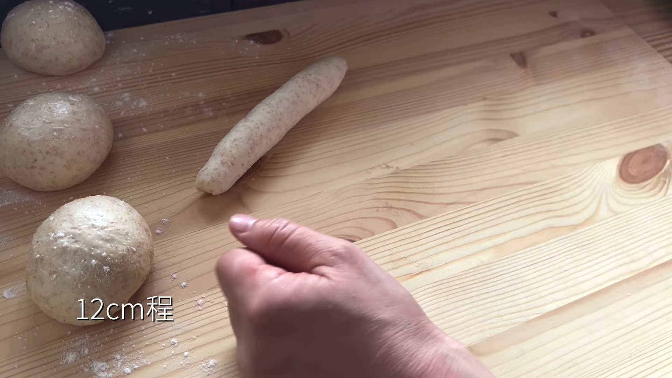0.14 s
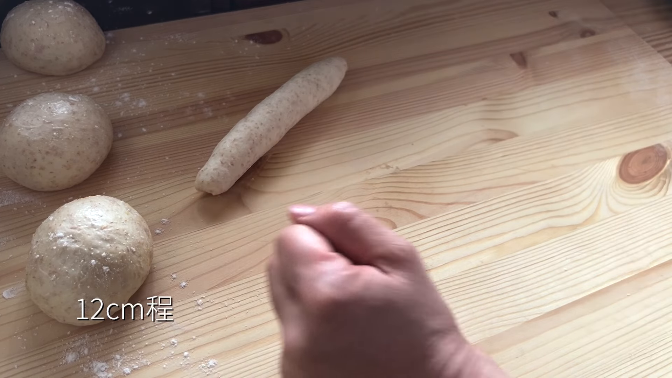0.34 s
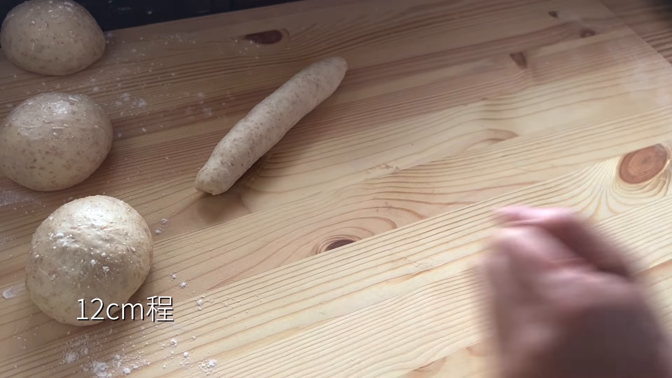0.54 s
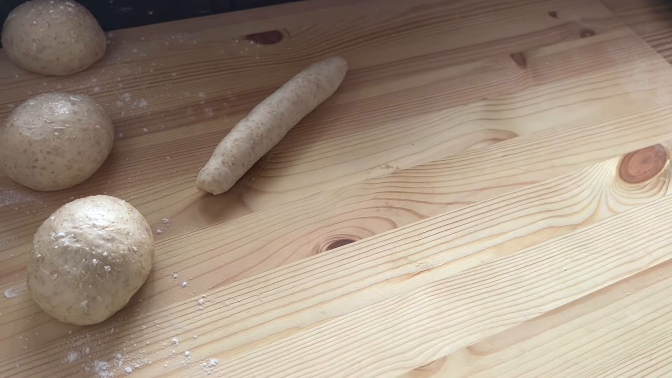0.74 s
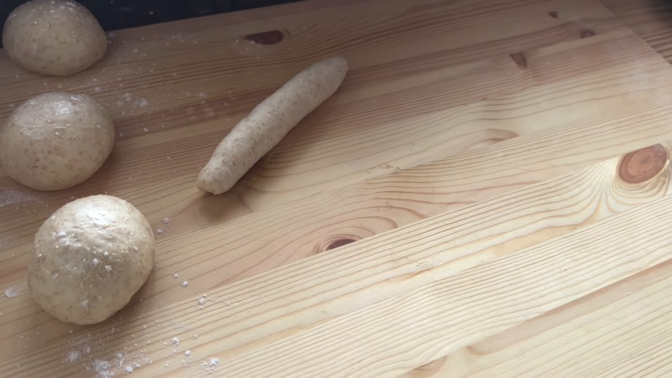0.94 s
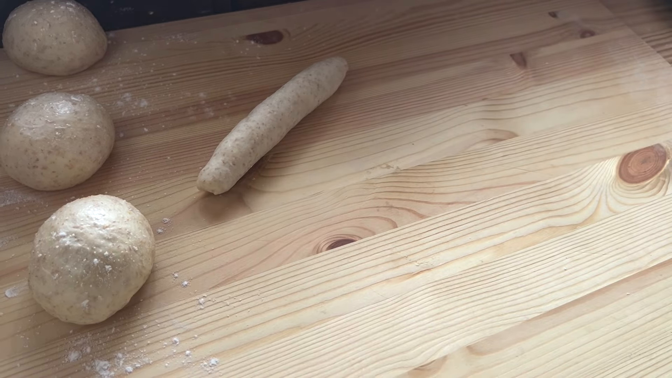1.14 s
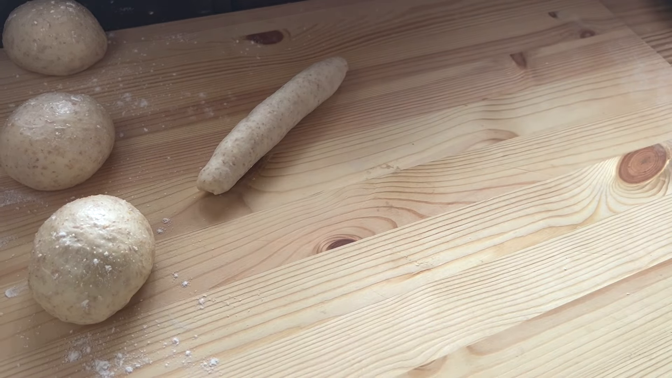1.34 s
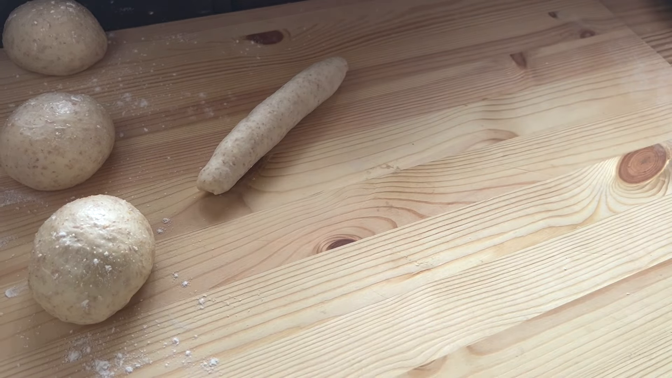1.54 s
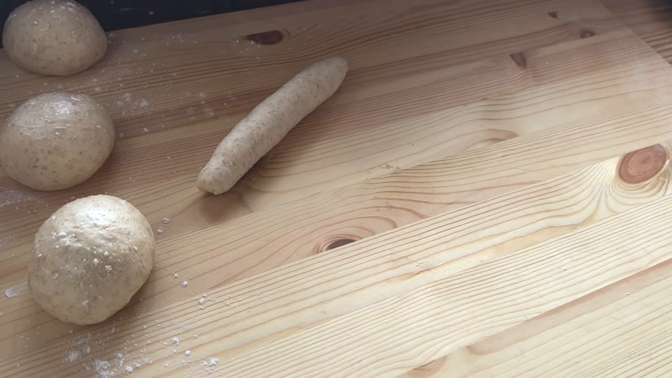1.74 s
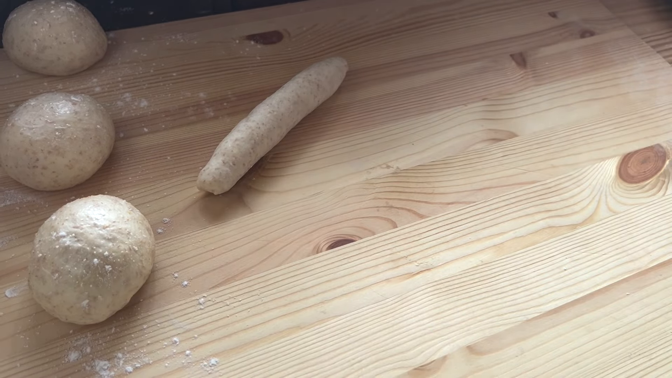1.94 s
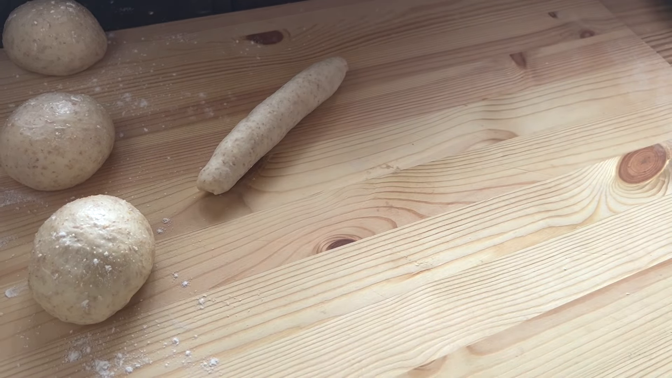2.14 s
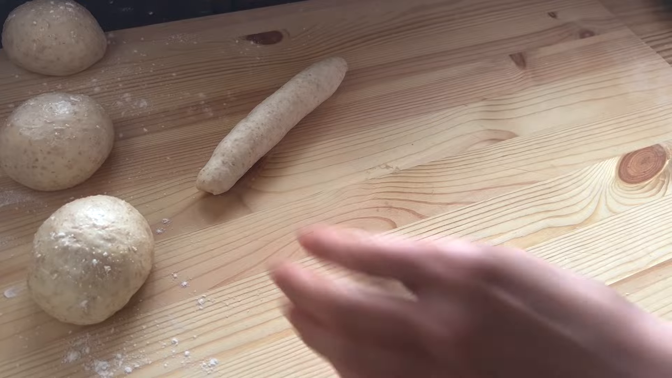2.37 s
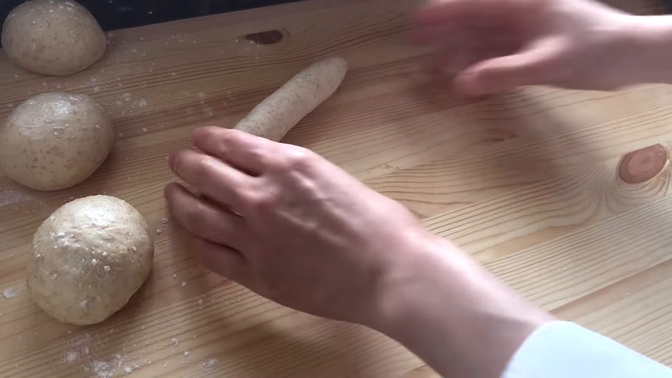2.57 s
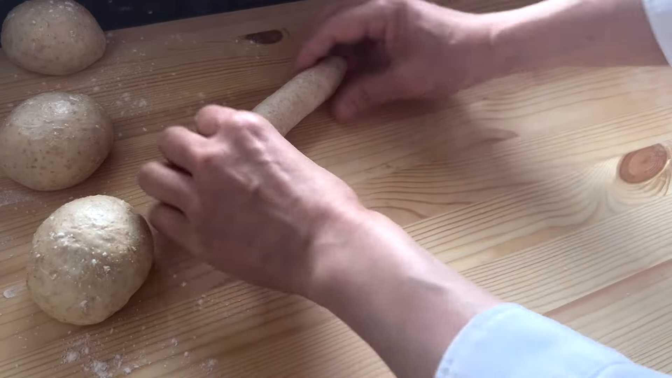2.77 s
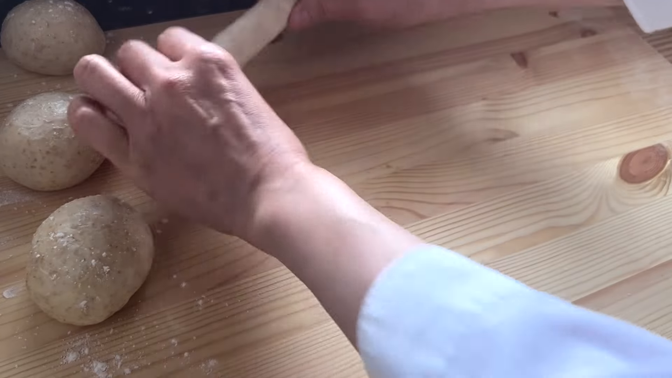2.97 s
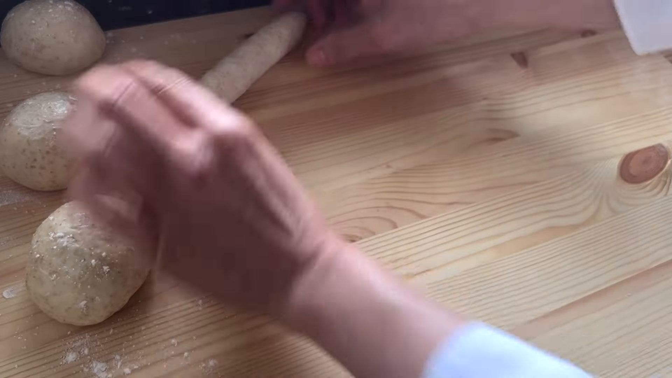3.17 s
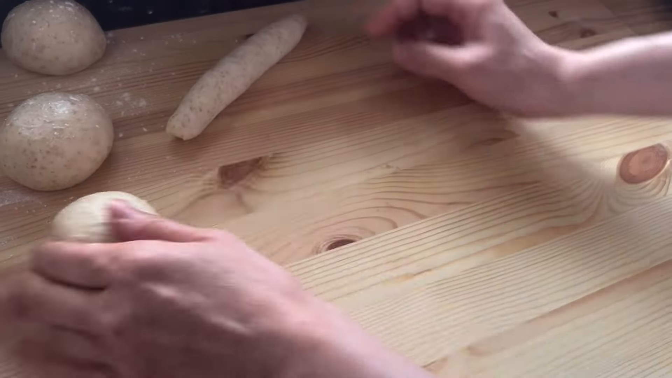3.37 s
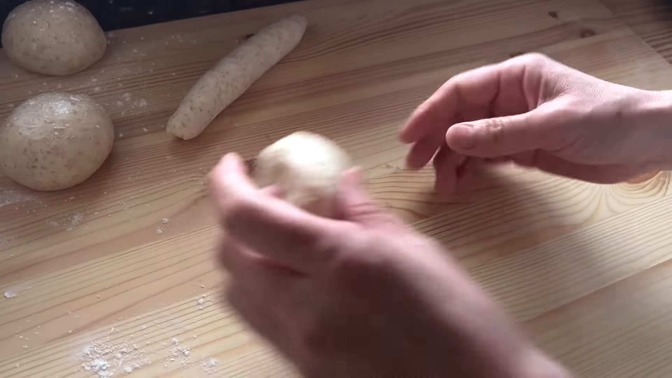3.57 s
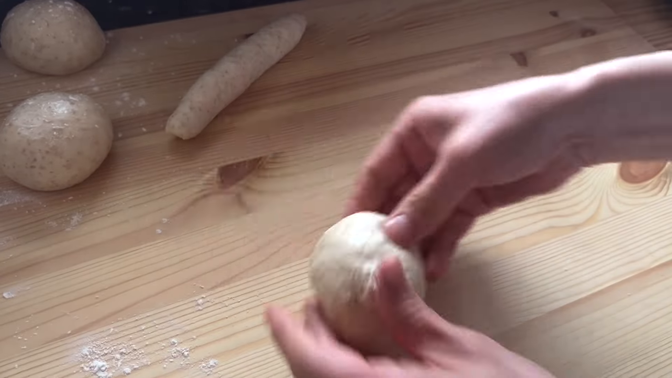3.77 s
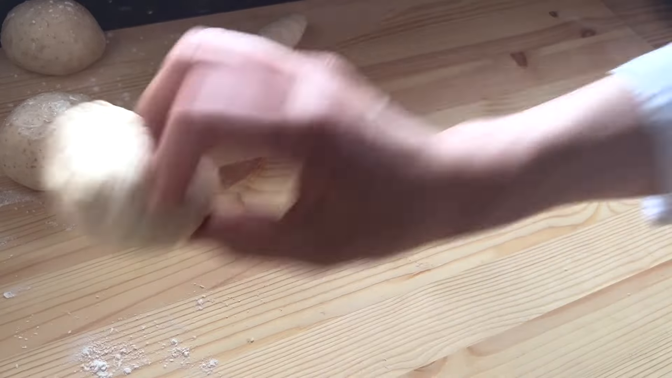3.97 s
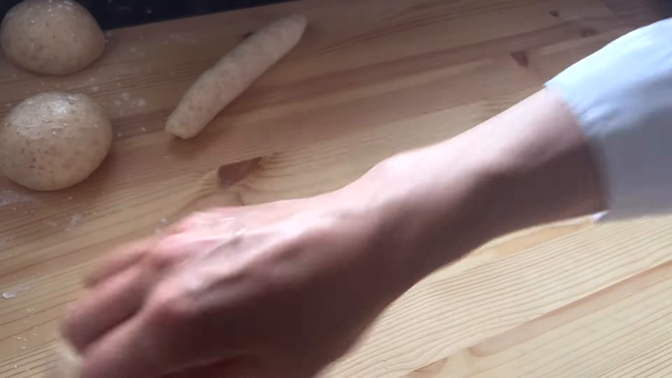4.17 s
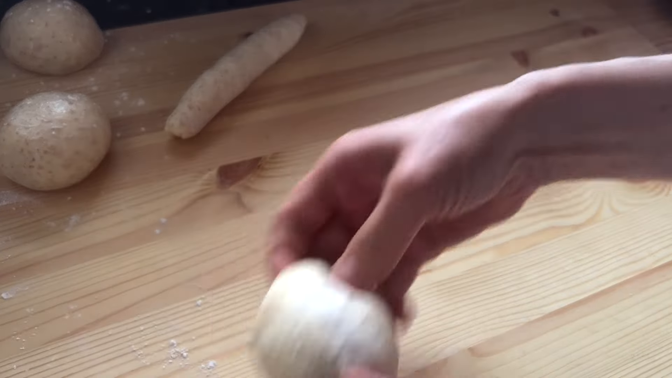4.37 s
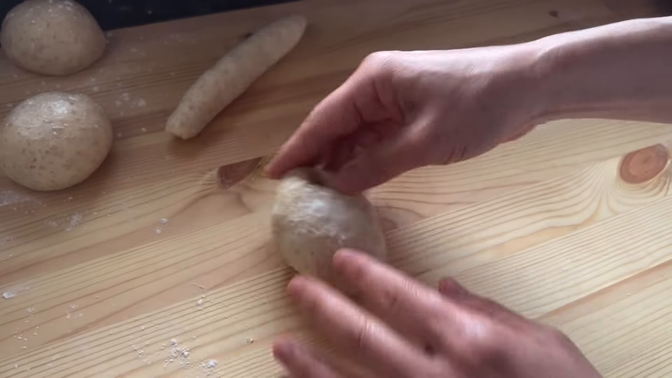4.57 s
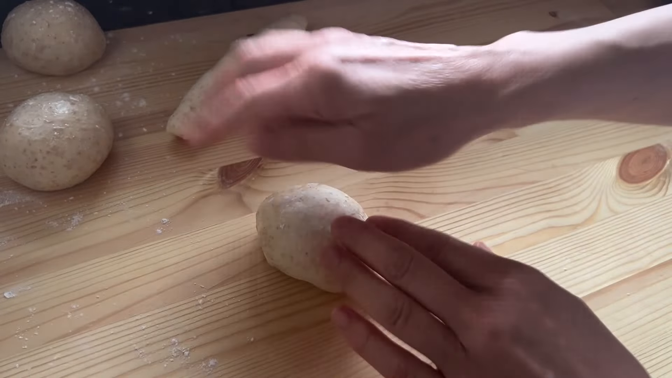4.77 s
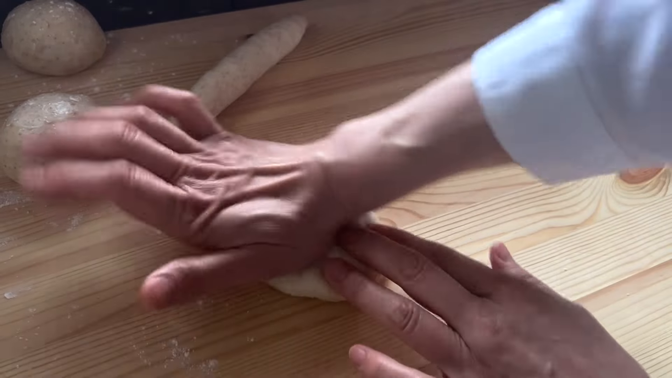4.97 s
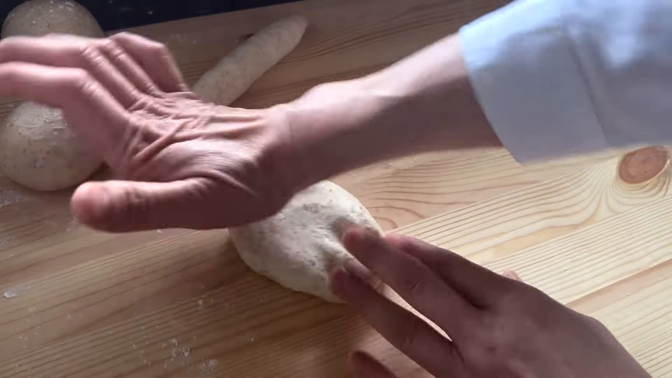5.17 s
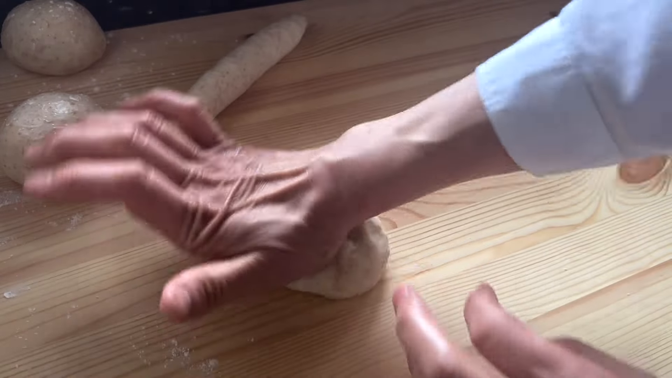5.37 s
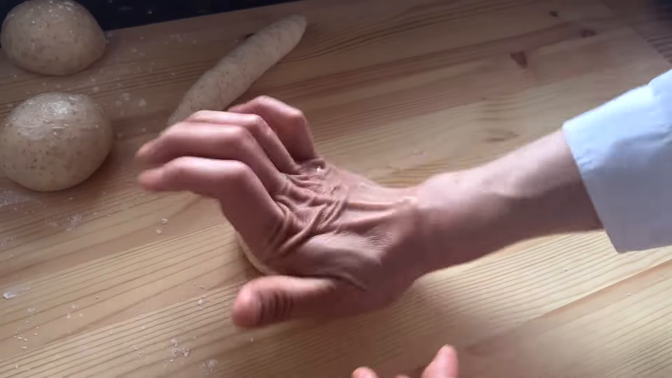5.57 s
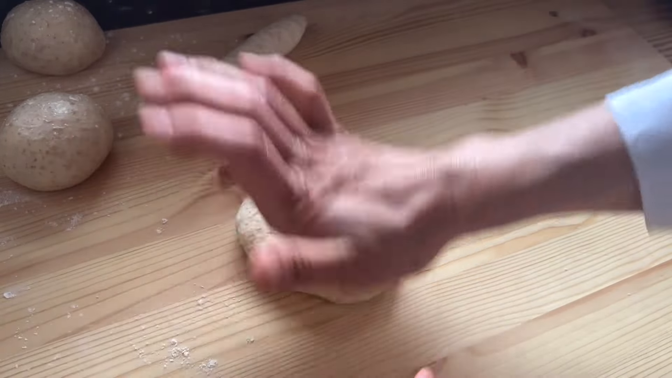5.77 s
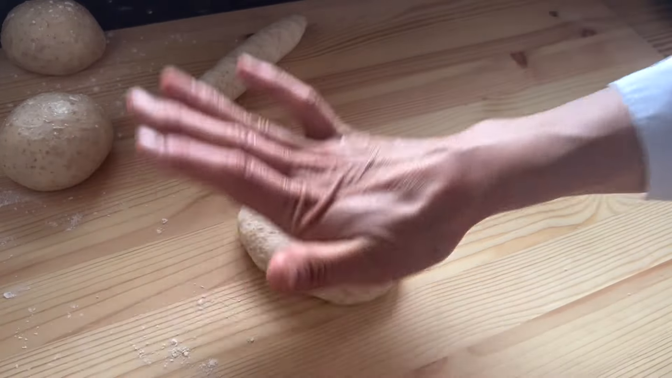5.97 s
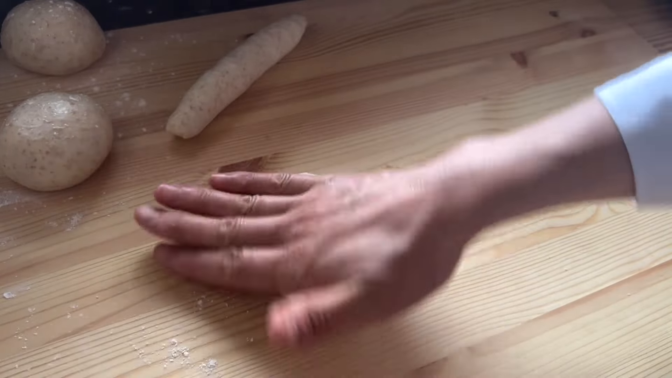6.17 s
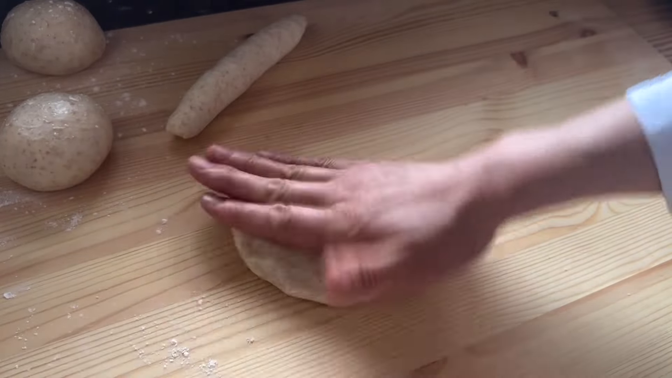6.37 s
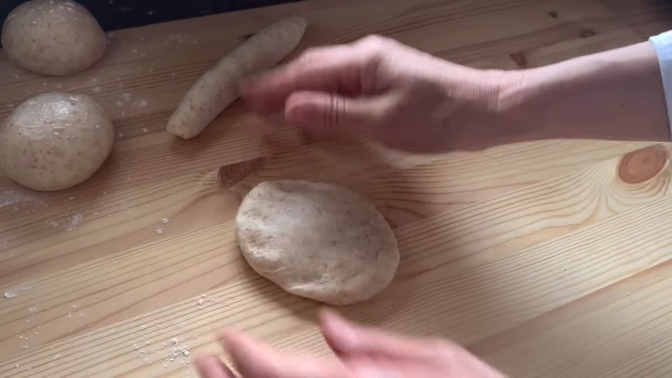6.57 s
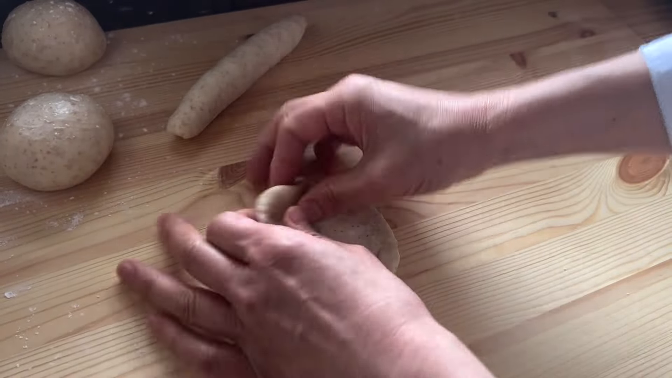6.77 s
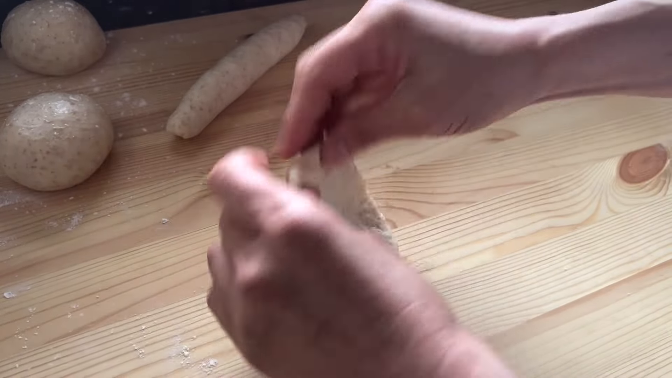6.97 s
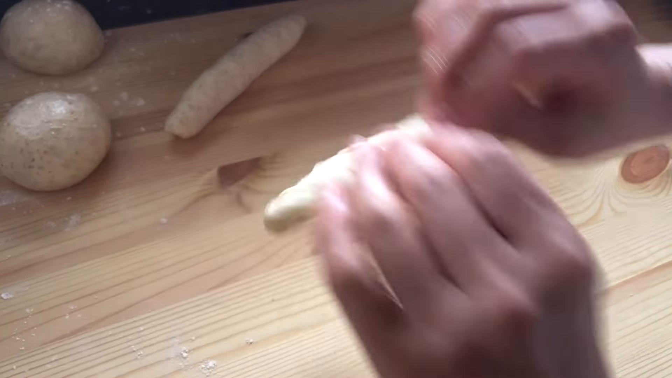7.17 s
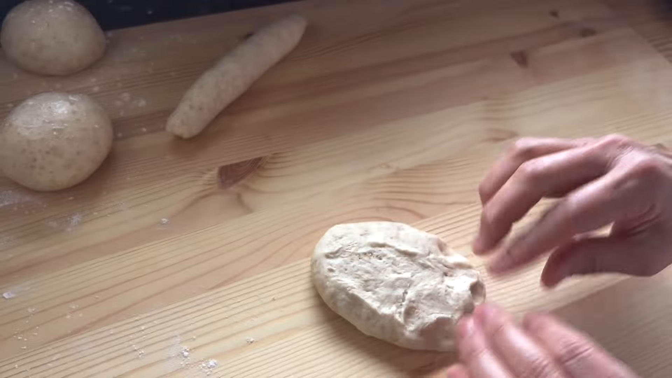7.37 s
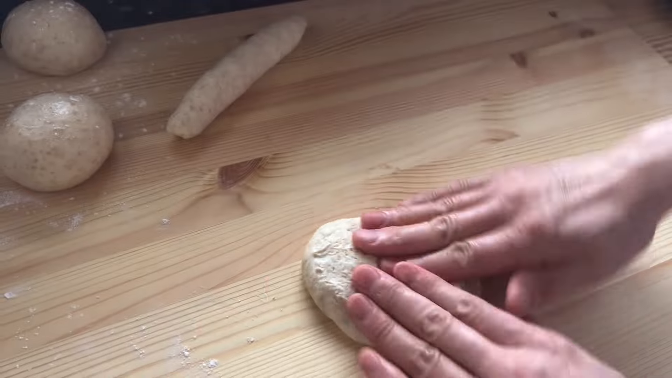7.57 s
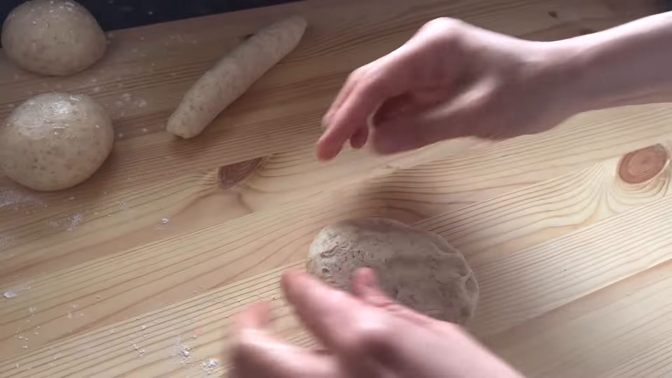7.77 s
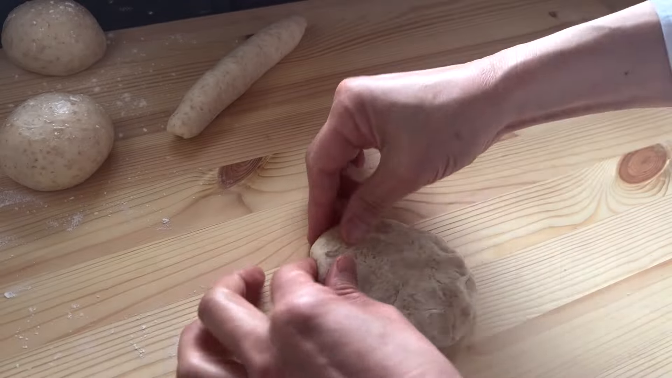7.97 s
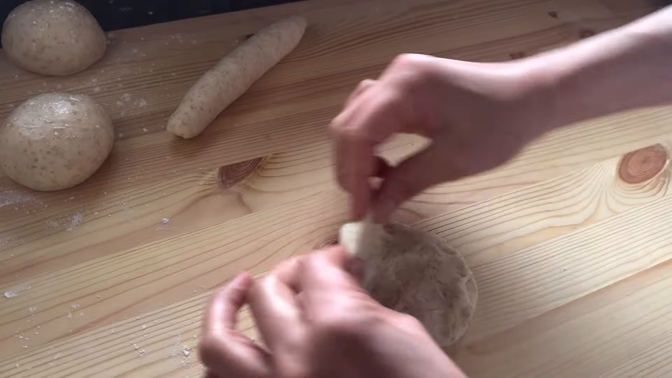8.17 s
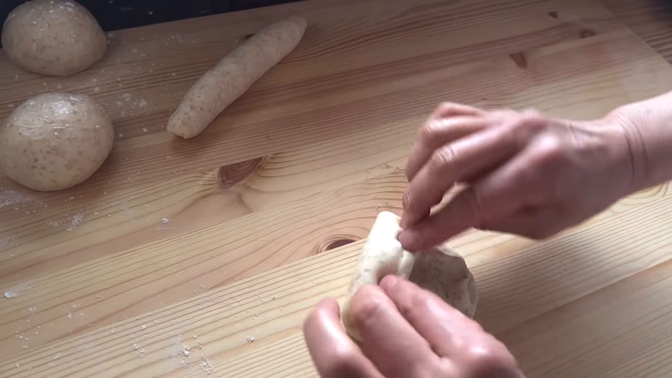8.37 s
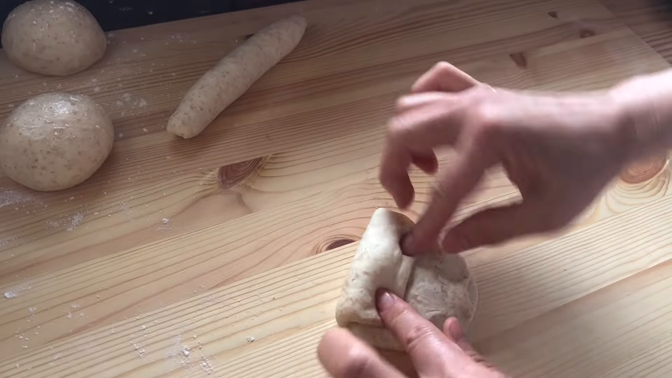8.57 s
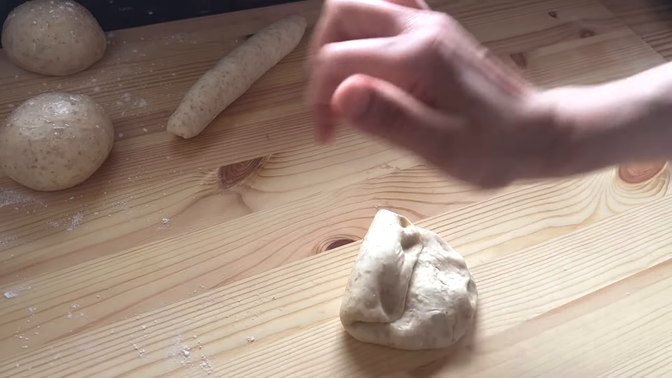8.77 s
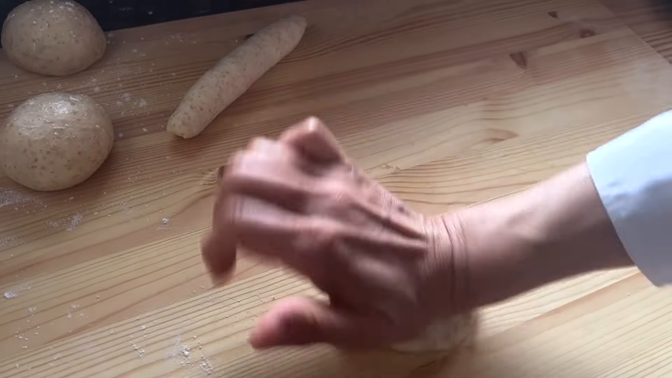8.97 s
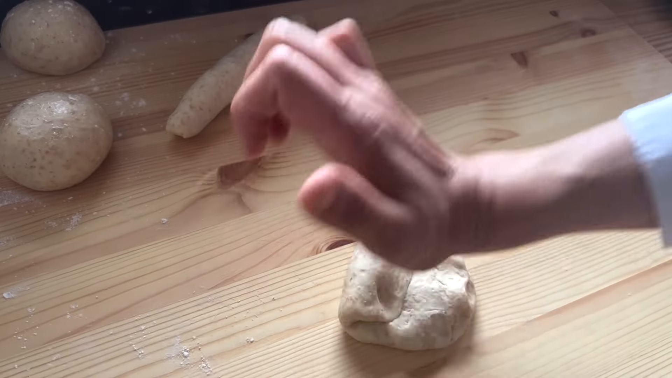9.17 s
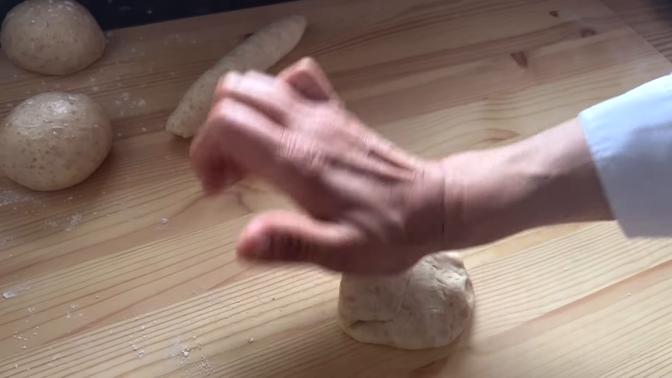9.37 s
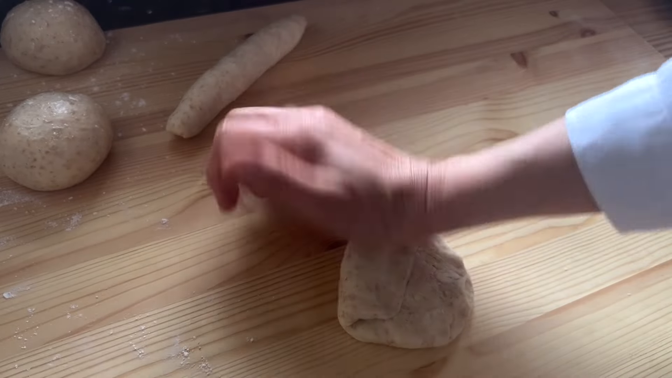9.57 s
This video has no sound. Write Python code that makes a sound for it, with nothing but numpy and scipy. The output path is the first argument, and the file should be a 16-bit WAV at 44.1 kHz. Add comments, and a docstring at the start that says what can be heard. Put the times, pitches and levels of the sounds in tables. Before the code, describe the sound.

Hands and sleeves rustle softly over a wooden table in a quiet kitchen. A little way off, tools are put down with hollow knocks and one brief metallic clink. Dough is picked up and slapped, then pressed in six deep regular thumps with crisp skin smacks. Sticky rubbing and two quick pats follow, quiet folding, and three duller thumps at the end. The microphone is close, with low table rumble.

```python
"""Hands pat and press soft dough on a wooden table in a quiet kitchen, close to a small microphone.
Each pat shoves the table top (a bump that rings deep modes) and skin smacks (short noise bursts).
Hands and sleeves rustle (shaped hiss and grains), slips squeak, and squeezed-out air whistles.
A little way off, kitchen tools are set down with bursts and hollow notes, one with a metal ring.
Low shaking, room tone, faint background hiss and noise-made echoes fill in the kitchen."""
import sys
import numpy as np
from scipy import signal
from scipy.io import wavfile
from scipy.ndimage import uniform_filter1d

SR = 44100
rng = np.random.default_rng(int(sys.argv[2]) if len(sys.argv) > 2 else 0)


def to_wav(sig):
    """Store sig (one row per channel, or 1-D mono) as 16-bit WAV at the path in sys.argv[1].

    Samples outside -1..1 are clipped; the rate is SR.
    """
    pcm = np.clip(np.atleast_2d(sig), -1, 1) * 32767
    pcm = np.round(pcm).astype(np.int16)
    wavfile.write(sys.argv[1], SR, pcm.T)  # frames by channels


N = 424241


def gain_of(db):
    """Turns decibels into a factor."""
    return 10 ** (np.asarray(db) / 20)


def evened(x):
    """Scales to rms 1."""
    return x / np.sqrt(np.mean(abs(x) ** 2) + 1e-20)


def read(points, hz):
    """Reads a table over pitch, with straight lines on a log-frequency axis."""
    point_hz, value = np.transpose(points)
    return np.interp(np.log(hz + 1), np.log(point_hz + 1), value)


def follow(rows, t):
    """Reads every column of a curve table at the times t."""
    point_s, *columns = np.transpose(rows)
    return [np.interp(t, point_s, column) for column in columns]


def add(mix, start_s, sound):
    """Mixes a sound in at a time, cut off at the end of the mix."""
    part = mix[round(start_s * SR):][:len(sound)]
    part += sound[:len(part)]


def band_filter(x, lo_hz, hi_hz):
    """Lets only the range between two pitches through."""
    edges = [lo_hz, min(hi_hz, .49 * SR)]
    return signal.sosfilt(signal.butter(2, edges, "band", fs=SR, output="sos"), x)


def band(x, lo_hz, hi_hz):
    """Band-pass, scaled to rms 1."""
    return evened(band_filter(x, lo_hz, hi_hz))


def modes(table, size):
    """The ring of a struck body: dying sine waves, stronger in proportion to pitch."""
    t = np.arange(size) / SR
    return sum(gain_of(level_db - 60 * t / t60_s) * np.sin(2 * np.pi * pitch_hz * t) * pitch_hz / SR
               for pitch_hz, level_db, t60_s in table)


def noise(colour_db, patchy_db, flicker_db):
    """Random short-time spectra with narrow resonances that come and go, and a flicker shared by all."""
    frames = colour_db.shape[1]
    real, imaginary, patches = rng.standard_normal((frames, 257, 3)).T
    patches = uniform_filter1d(patches, size=2, axis=0)
    patches = evened(uniform_filter1d(patches, size=30, axis=1))
    flicker = rng.standard_normal(frames)
    level = gain_of(colour_db + patchy_db * patches + flicker_db * flicker)
    spectra = (real + 1j * imaginary) * level
    return signal.istft(spectra, nperseg=512, noverlap=384)[1][:N]


def stroke(rise_s, fall_s, top_db, sag_db):
    """The level of one stroke: builds, changes evenly over the fall, then dies fast at its end."""
    t = np.arange(0, rise_s + fall_s + .1, 1 / SR)
    sag = sag_db * np.clip((t - rise_s) / fall_s, 0, 1)
    lift = 404 * np.maximum(t - rise_s - fall_s, 0)  # decay of 404 dB per second
    return np.minimum(t / rise_s, 1) ** 0.55 * gain_of(top_db + sag - lift)


def crackle():
    """Sparse grains: flour ticks, sticky dough letting go, bursting air cells."""
    out = np.zeros(N)
    for pitch_hz, cycles in zip(np.geomspace(900, 13000, 24), np.tile([1.5, 4, 12], 8)):
        t = np.arange(round(cycles * SR / pitch_hz)) / SR
        size_db = 6.8 * np.minimum(rng.exponential(1, N), 4)
        starts = gain_of(size_db) * (rng.random(N) < 22 / SR)  # about 22 a second at each pitch
        grain = np.sin(2 * np.pi * pitch_hz * t) * np.hanning(len(t))
        grain *= (pitch_hz / 3000) ** 0.11 / np.sqrt(cycles)
        out += signal.oaconvolve(starts, grain)[:N]
    return evened(out)


# hands and sleeves slide, dough peels off; the faintest rows are soft background hiss between them:
# start_s, rise_s, fall_s, top_db, sag_db (change over the fall), low_mids_db and air_db (relative to the top)
STROKES = [(0, 0.0086, 0.11, -74.5, 1.5, 3, -4), (0.078, 0.19, .12, -57.5, -13.5, 3.5, -6),
           (0.398, 0.033, 0.1, -67.5, -20, -4, -4.5), (.48, 0.014, 0.056, -80, 0, -4, 0),
           (0.551, .014, 0.069, -66.5, -7, 1, -4.5), (.62, 0.1, 0.21, -59, -6, 0, -6),
           (.99, 0.011, .12, -67, -15, 1, 1), (1.16, 0.077, 0.12, -60.5, -9, 1.5, -2.5),
           (1.45, 0.0058, 0.19, -57, -30, -2, -8), (1.6, 0.028, 0.14, -90.5, 12, 8.5, -4),
           (1.789, 0.0057, 0.14, -66, -0.5, 8.5, -7.5), (1.949, 0.034, 0.19, -66.5, -19.5, 12.5, -4.5),
           (2.1, 0.017, 0.064, -83, 4, 14, -7), (2.19, 0.072, 0.053, -57.5, 0.5, 1.5, -6.5),
           (2.33, 0.086, 0.16, -59, -15.5, -0.5, -8), (2.505, .01, 0.059, -69, -17, 1, -6),
           (2.59, 0.074, 0.027, -66.5, -10, 2, -1), (2.68, 0.068, 0.15, -66.5, -3, -0.5, -2),
           (2.929, 0.059, 0.064, -56, -5, 0.5, -8.5), (3.06, 0.039, 0.11, -57, -11, 5.5, -7.5),
           (3.2, .13, .08, -59.5, -7.5, 3, -6.5), (3.42, 0.026, 0.2, -59, -12.5, -3, -4),
           (3.69, .01, 0.054, -86.5, 4, 4, -8), (3.775, .012, 0.075, -73.5, -1, 0, -2),
           (3.88, .2, 0.032, -63.5, 1, 0.5, -10), (4.12, .14, 0.12, -55, -24.5, 1, -2.5),
           (4.395, 0.016, 0.055, -70, -12, 11, -5), (4.535, 0.022, 0.14, -73, -3.5, -0.5, 2.5),
           (4.71, 0.014, .12, -67.5, -21, 6, -6), (4.985, 0.021, 0.045, -56.5, -12, -2, -4),
           (5.066, 0.02, 0.046, -60.5, -16, -13, 1), (5.299, 0.0072, 0.069, -52, -11, -5, -4.5),
           (5.4, 0.017, 0.11, -64, -25, -0.5, -2.5), (5.575, 0.019, 0.081, -60, -11, -1.5, -4.5),
           (5.685, 0.015, 0.048, -65.5, -20, -1, -1), (5.88, 0.1, 0.059, -64, -33, -1, -3.5),
           (6.058, 0.0095, 0.017, -76.5, -21, -12, 0), (6.178, 0.0038, 0.075, -59.5, -12, 1.5, -4.5),
           (6.415, .01, 0.24, -62.5, -12.5, -9.5, -2), (6.641, .01, 0.027, -68.5, -12, -2.5, -5.5),
           (6.681, 0.12, 0.035, -60.5, -2, -3.5, -3.5), (6.815, 0.021, 0.019, -48.5, -17, -4.5, -10.5),
           (6.86, 0.063, 0.014, -58, -16, 0, -4.5), (6.931, 0.017, 0.22, -64, -1.5, 6, -5.5),
           (7.2, .01, 0.17, -85.5, 4, 0, -4.5), (7.331, .005, 0.018, -64.5, -23, 3, 1),
           (7.371, .004, .06, -86, -23, 20, -10), (7.584, 0.0034, 0.097, -62, -4.5, 2.5, -6),
           (7.706, 0.025, 0.1, -64, -29, 6.5, -3.5), (7.876, 0.028, 0.14, -69, -10.5, 2, -3.5),
           (8.061, 0.012, 0.15, -71, -19, -0.5, -5), (8.538, 0.011, 0.097, -61.5, -5.5, 4.5, -6.5),
           (8.67, .005, 0.064, -83, 3, -1, -14), (8.9, 0.045, 0.018, -75.5, -2, -3, -7),
           (8.987, 0.011, 0.12, -59, -23.5, 1.5, -3.5), (9.265, 0.013, 0.082, -59.5, -11.5, 0.5, -4.5),
           (9.522, 0.0049, 0.085, -64, -17.5, -3, -4)]
# balance of the hiss: pitch_hz, level_db (relative, per Hz)
RUB_COLOUR = [(120, -62), (200, 14.5), (416, 6), (590, 9.5), (867, 8.5), (933, 11), (1740, 1), (2130, 1),
              (2420, -1), (8420, -5.5), (16000, -16.5)]
# how far the low-mid setting reaches: pitch_hz, share (0 to 1)
LOW_MID_REACH = [(200, 1), (1100, 1), (1800, 0)]
# how far the air setting reaches: pitch_hz, share (0 to 1)
AIR_REACH = [(5000, 0), (8000, 1)]
USUAL_LOW_MIDS_DB, USUAL_AIR_DB = 6.5, -3  # settings at which RUB_COLOUR holds unchanged


def rub():
    """Friction hiss of many tiny slips, with crackle, and soft background hiss; each row has its colour."""
    hz, rows = np.fft.rfftfreq(512, 1 / SR), np.array(STROKES)
    frame_s = np.arange(N // 128 + 5) * 128 / SR
    latest = np.maximum(np.searchsorted(rows[:, 0], frame_s) - 1, 0)  # last row to have started
    low_mids_db, air_db = rows[latest, 5:].T
    colour = read(RUB_COLOUR, hz)[:, None]
    colour = colour + read(LOW_MID_REACH, hz)[:, None] * (low_mids_db - USUAL_LOW_MIDS_DB)
    colour = colour + read(AIR_REACH, hz)[:, None] * (air_db - USUAL_AIR_DB)
    hiss = noise(colour, patchy_db=2.5, flicker_db=1.33)
    hiss /= np.sqrt(np.mean(band_filter(hiss, 1500, 6000) ** 2))  # levels refer to this range

    slips = gain_of(2.0 * rng.exponential(1, N)) * (rng.random(N) < 900 / SR)  # about 900 a second
    slips = evened(uniform_filter1d(slips, size=30))
    level = np.zeros(N)
    for start_s, rise_s, fall_s, top_db, sag_db, _, _ in STROKES:
        add(level, start_s, stroke(rise_s, fall_s, top_db, sag_db))
    level *= gain_of(0.5 * band(rng.standard_normal(N), 8.5, 26.7))  # unsteady pressure, in dB
    return level * (hiss * evened(1 + 0.2 * slips) + gain_of(-17) * crackle())


# table and floor shake as the cook leans and steps: middle_s, half_length_s, deep_db, hum_db
LEANS = [(.01, 0.052, -50, -70), (0.152, 0.067, -56, -50), (0.29, 0.14, -55, -58.5),
         (0.897, 0.14, -42.5, -47.5), (1.463, 0.15, -59, -62.5), (1.806, .12, -56.5, -62),
         (2.198, 0.047, -51, -47.5), (2.43, 0.2, -43.5, -59.5), (2.82, 0.17, -49, -71),
         (3.13, 0.095, -50, -48), (3.385, 0.088, -54, -50.5), (4.185, 0.074, -42, -60),
         (4.56, 0.1, -65, -69), (6.734, 0.1, -53, -59), (7.08, 0.12, -74, -61.5), (7.67, 0.11, -63, -56.5),
         (8.626, 0.081, -64, -58)]
# slow sway of the microphone: time_s, level_db
SWAY = [(0.0, -25), (0.13, -26), (0.67, -59.5), (0.8, -41.5), (1.85, -67.5), (2.44, -53.5), (3.88, -51),
        (4.5, -37.5), (4.88, -46.5), (5.41, -40), (5.76, -46), (6.46, -33.5), (6.67, -47), (6.78, -36),
        (7.21, -47.5), (7.26, -39.5), (8.22, -56), (9.62, -46.5)]
STILL_DEEP_DB, STILL_HUM_DB = -66.5, -68.5  # with nobody leaning
AFTER_DB = -23  # shaking left by a thump, relative to its level
AFTER_DEEP_T60_S, AFTER_HUM_T60_S = 1.0, 0.36  # time to die away by 60 dB


def shake():
    """Low noise through the floor's and the table's lowest resonances, and a slow sway."""
    t = np.arange(N) / SR
    deep_noise, hum_noise, sway_noise = rng.standard_normal((3, N))
    deep_level = np.full(N, gain_of(STILL_DEEP_DB))
    hum_level = np.full(N, gain_of(STILL_HUM_DB))
    for middle_s, half_length_s, deep_db, hum_db in LEANS:
        swell = np.exp(-((t - middle_s) / half_length_s) ** 2)
        deep_level += gain_of(deep_db) * swell
        hum_level += gain_of(hum_db) * swell
    for start_s, level_db, _, _ in THUMPS:
        add(deep_level, start_s, gain_of(level_db + AFTER_DB - 60 * t[:SR] / AFTER_DEEP_T60_S))
        add(hum_level, start_s, gain_of(level_db + AFTER_DB - 60 * t[:SR] / AFTER_HUM_T60_S))
    deep = deep_level * band(deep_noise, 20, 42.4)
    hum = band(hum_noise, 71.2, 98.7) + gain_of(-5.0) * band(hum_noise, 79, 135.5)
    sway = band(band(sway_noise, 2.3, 6.97), 2.3, 6.97)  # filtered twice for steeper edges
    return deep + hum_level * evened(hum) + gain_of(follow(SWAY, t)[0]) * sway


# balance of the room tone: pitch_hz, level_db (relative, per Hz)
HUSH = [(88, -32), (150, -10), (201, -11.5), (286, 5), (689, -17.5), (1500, -18.5), (1900, -24),
        (2140, -21.5), (9080, -25.5), (15100, -29.5), (16000, -47)]
HUSH_DB = -73  # overall rms level


def hush():
    """Steady room tone: quiet noise with a fixed balance and a slight flicker."""
    colour = read(HUSH, np.fft.rfftfreq(512, 1 / SR))[:, None] + np.zeros(N // 128 + 5)
    return gain_of(HUSH_DB) * evened(noise(colour, patchy_db=3.0, flicker_db=-1.5))


# higher modes of the board, rung by bursts: pitch_hz, level_db (before modes() tilts it), t60_s
# pitch and level shift a little at random for every burst
BOARD = [(331, -14, 0.093), (333.5, -0.5, 0.076), (394, 2, 0.033), (510, 2, 0.035), (710, -5, 0.042),
         (1030, -13, 0.013)]
CREST_DB = 2.5  # allowance for peak over rms of a burst


def bursts(rows, t60_s, rise_ms, wood_db):
    """Short dying noise in four ranges; the low ones last longer and ring the board, anew at every spot."""
    out, t = np.zeros(N), np.arange(8000) / SR
    size = len(t)
    chance = rng.standard_normal((len(rows), 4, size + 2000))  # the extra lets the filters settle
    spots = rng.standard_normal((len(rows), len(BOARD), 2))
    for (start_s, peak_db, body_db, air_db, thud_db), noises, spot in zip(rows, chance, spots):
        body_noise, main_noise, air_noise, thud_noise = noises
        spot_modes = [(pitch_hz * (1 + 0.038 * shift), level_db + 3 * change, mode_t60_s)
                      for (pitch_hz, level_db, mode_t60_s), (shift, change) in zip(BOARD, spot)]
        board = modes(spot_modes, size)
        onset = gain_of(peak_db - CREST_DB) * (1 - np.exp(-t * 1000 / rise_ms))

        body = gain_of(body_db - 45 * t / t60_s) * band(body_noise, 442, 1110)[-size:]
        thud = gain_of(thud_db - 25 * t / t60_s) * band(thud_noise, 212, 534)[-size:]
        low = body + thud
        crisp = band(main_noise, 710, 4580) + gain_of(air_db) * band(air_noise, 4000, 10750)
        crisp = gain_of(-60 * t / t60_s) * crisp[-size:]
        wood = signal.oaconvolve(onset * low, board / np.linalg.norm(board))[:size]
        add(out, start_s, onset * (crisp + low) + gain_of(wood_db) * wood)
    return out


# tools set down further off: start_s, peak_db (nominal, of the main range),
# body_db, air_db, thud_db (all three relative to that peak)
CLATTER = [(0.9583, -48.5, -12, 7, -8), (1.1256, -50.5, 10.5, -21.5, -15), (1.1503, -46, -12, -11, -18),
           (1.3642, -51, 8, -9, -13), (1.4156, -36.5, -9, -7, -14.5), (1.7299, -45.5, 5, 2, -12)]


def clatter():
    """Tools land further off: slower, longer noise bursts."""
    return bursts(CLATTER, t60_s=0.16, rise_ms=2.5, wood_db=-23)


# hollow notes that the tools sound as they land: start_s, pitch_hz, level_db, t60_s
HOLLOW = [(.96, 3670, -52, 0.23), (.96, 4630, -51.5, 0.25), (1.128, 1047, -47.5, 0.22),
          (1.128, 726, -47, 0.093), (1.127, 416, -45.5, 0.13), (1.365, 945, -45, 0.17),
          (1.366, 590, -54, 0.15), (1.417, 3440, -49, 0.17), (1.417, 1690, -44.5, 0.094),
          (1.418, 1950, -44.5, 0.15), (1.417, 813, -47, 0.22), (1.417, 360, -45, 0.11),
          (1.731, 336, -43, 0.18), (1.733, 790, -64, 0.2)]


def hollow_notes():
    """Dying narrow bands of noise sound like short hollow notes."""
    out, t = np.zeros(N), np.arange(8000) / SR
    chance = rng.standard_normal((len(HOLLOW), len(t) + 4000))
    for (start_s, pitch_hz, level_db, t60_s), source in zip(HOLLOW, chance):
        note = band(source, pitch_hz / 1.062, pitch_hz * 1.093)[-len(t):]
        add(out, start_s, gain_of(level_db - 60 * t / t60_s) * note)
    return out


# slips that lock onto one pitch: start_s, end_s, pitch_hz, width_hz, level_db
SQUEAKS = [(1.23, 1.337, 3640, 120, -65.5), (2.22, 2.247, 2200, 90, -57), (2.229, 2.271, 1870, 120, -58),
           (2.257, 2.32, 2156, 50, -57.5), (2.338, 2.42, 2160, 90, -64), (2.39, 2.451, 237, 176, -51.5),
           (8.518, 8.669, 1020, 200, -63), (4.708, 4.755, 2040, 150, -66)]


def squeaks():
    """Narrow bands of noise where a slip locks onto one pitch."""
    out = np.zeros(N)
    chance = rng.standard_normal((len(SQUEAKS), 8000))
    for (start_s, end_s, pitch_hz, width_hz, level_db), source in zip(SQUEAKS, chance):
        size = round((end_s - start_s) * SR)
        squeak = band(source, pitch_hz - width_hz / 2, pitch_hz + width_hz / 2)[-size:]
        add(out, start_s, gain_of(level_db) * squeak * np.hanning(size) ** 0.35)
    return out


# modes of the metal tool: pitch_hz, level_db (relative, before modes() tilts it), t60_s
METAL = [(2220, 6, 0.091), (2230, 11, 0.052), (5020, -6, 0.089), (5430, -4, .12), (5830, -1, 0.078),
         (6730, 2.5, 0.14), (6660, -17, 0.15), (9270, -15, 0.095), (9040, -3, 0.099), (11030, -16, .1),
         (13500, -24, .08), (14430, -23, .08), (15700, -19, .06)]
RING_S, RING_DB = 1.731, -45.5  # start, and rms level of the first 2000 samples


def metal_ring():
    """The metal tool chatters for some milliseconds (a dying noise) and its modes ring on."""
    out, t = np.zeros(N), np.arange(8000) / SR
    chatter = rng.standard_normal(len(t)) * gain_of(-60 * t / 0.05)
    tone = signal.oaconvolve(modes(METAL, size=len(t)), chatter)
    add(out, RING_S, gain_of(RING_DB) * tone / np.std(tone[:2000]))
    return out


# skin meets dough or wood: start_s, peak_db (nominal, of the main range),
# body_db, air_db, thud_db (all three relative to that peak)
SMACKS = [(2.1804, -54, 1, 2, -2), (3.0731, -47, 14, 4.5, 8), (3.3517, -50.5, -8, -21.5, 8.5),
          (3.7853, -63.5, 1, -9, 11), (3.8397, -55, 1.5, -8, -2), (4.116, -33, 0.5, -16, -4.5),
          (4.492, -64, -7, -12, -15), (4.511, -56, 2.5, -14, 0), (4.9743, -48, -9, -6, -8),
          (4.9938, -54, -12, -7, -12), (5.0729, -54, -21, -2, -11), (5.1363, -53, -8, -1, -15),
          (5.221, -62, 8, 4, -7), (5.2443, -56.5, -7, -21, -8), (5.2877, -40, -20, -7, -29),
          (5.293, -41, -7, 1.5, 0), (5.3397, -41, -21, -9, -27), (5.3694, -45, -15, -12, -11),
          (5.4454, -56, -13, -10, -8), (5.569, -54, 0, -17, -7), (5.5755, -49.5, -11, -11, -3),
          (5.6218, -43, -6, -8, -12), (5.6424, -46, -18, -11, -21), (5.701, -45, -21, -14, -12),
          (5.7214, -53.5, -8, -7, -10), (5.8546, -22.5, -3.5, -7, -13), (6.135, -22.5, -10, -4, -10.5),
          (6.2674, -52, -17, -16, -14), (6.3869, -35, 4, -22, -20), (6.392, -24, -13.5, -7, -11),
          (6.4933, -47.5, -15, -7, -15), (6.6488, -59, -8, -15, 1), (7.3222, -35, -5, -9, -13.5),
          (7.3612, -35.5, -1, -12, 2), (7.556, -52, 5, -7, -3), (7.5678, -34.5, -1.5, -2.5, -3),
          (7.8973, -48, 4, -27, 0), (8.0706, -52.5, 5.5, -18, -6), (8.331, -64, -18, -19, -11),
          (8.4951, -62.5, 12.5, -27, -11), (8.6507, -47.5, -8, -2, -9), (8.663, -49, -1, -2, -16),
          (8.9796, -50, -10, -7, -16), (8.9886, -57, -11, -13.5, -4), (9.068, -51, -4, -4, -19),
          (9.1088, -62.5, -12, -14, 10), (9.2666, -54, -7, 5, 0.5), (9.394, -58.5, -9, 0, -9),
          (9.5324, -53.5, -20, 8, -23), (9.5543, -50, -16, -8, -15)]


def smacks():
    """Skin meets dough or wood: quick, short noise bursts."""
    return bursts(SMACKS, t60_s=0.02, rise_ms=0.75, wood_db=-12)


# the table top is shoved and springs back: time_s (of the deepest downward jolt), level_db (size of that
# downward jolt), # contact_ms (spread of the bump), softness (no unit; higher makes the bump more even-sided)
THUMPS = [(3.0787, -35.5, 3.1, 2.73), (3.361, -39.5, 7.4, 3.4), (4.126, -32, 4.9, 4.9),
          (4.6847, -45.5, 4, 8.1), (5.002, -26, 10.1, 60), (5.309, -19.5, 7.9, 29), (5.5995, -21, 8, 110),
          (5.8659, -21, 6.3, 6.6), (6.1463, -20, 5.6, 5.9), (6.4012, -23, 7, 4.1),
          (7.334, -41.5, 7.1, 11.2), (7.3652, -39.5, 5.9, 2.4), (7.5822, -31, 10.5, 2.8),
          (9.005, -22.5, 6.3, 126), (9.2885, -23, 7.2, 42), (9.546, -28, 8.1, 49)]
# deep modes of the table, rung by the shove: pitch_hz, level_db (relative, before modes() tilts it), t60_s
TABLE = [(49.3, 0, 0.2), (84.1, -4.5, 0.37), (112, -4, 0.29), (156.4, 6, 0.17)]


def thumps():
    """The microphone feels the acceleration of a lopsided bump; the blow also rings the table."""
    out, t = np.zeros(N), np.arange(1, 6000) / SR
    for time_s, level_db, contact_ms, softness in THUMPS:
        u = t / (contact_ms / 1000 / np.sqrt(softness))
        bump = np.exp(softness * np.log(u / softness) - u + softness)
        jolt = np.diff(bump, 2)  # acceleration is the second difference of position
        add(out, time_s - t[jolt.argmin()], gain_of(level_db) * jolt / -jolt.min())
    table_ring = signal.oaconvolve(out, modes(TABLE, size=16000))[:N]
    return out + gain_of(-1.0) * table_ring


# air squeezed out of the dough whistles: start_s, start_hz, end_hz, peak_db,
# glide_ms (time to reach end_hz; the tone glides on as it fades and lasts twice this)
PIPS = [(5.293, 4900, 5200, -41.5, 4.3), (5.306, 8000, 7860, -38.5, 4.6), (5.322, 3060, 2580, -44, 8.5),
        (5.342, 11300, 9200, -58, 21), (5.592, 15200, 15100, -49, 6), (5.609, 1780, 1750, -53, 6.4),
        (5.641, 1880, 1780, -59, 4.9), (9.531, 7000, 6960, -45, 1.8)]


def pips():
    """Short gliding tones with a quick start and a slower end."""
    out = np.zeros(N)
    for start_s, start_hz, end_hz, peak_db, glide_ms in PIPS:
        u = np.arange(0, 2, 1000 / SR / glide_ms)
        swell = 3 * u * np.exp(1 - 3 * u)
        pitch_hz = start_hz + (end_hz - start_hz) * u
        add(out, start_s, gain_of(peak_db) * swell * np.sin(2 * np.pi * np.cumsum(pitch_hz) / SR))
    return out


# how fast the room's echoes die: pitch_hz, t60_s
KITCHEN = [(200, 0.2), (530, 0.18), (1400, 0.17), (3700, 0.12), (9700, 0.15)]


def kitchen(x):
    """Noise tails, each band dying at its own speed; three take turns so that no two hits ring alike."""
    out, turn = np.zeros(N), np.arange(N) / SR * 2 * np.pi * 1.2  # 1.2 turns a second
    for k, taps in enumerate(rng.standard_normal((3, SR // 2))):
        taps = taps * (np.arange(len(taps)) > 120)  # a short gap before the echoes
        hz, t, spectra = signal.stft(taps, SR, nperseg=256)
        fade = gain_of(-60 * t / read(KITCHEN, hz)[:, None])
        tail = signal.istft(spectra * fade, SR, nperseg=256)[1]
        share = np.sqrt(2 / 3) * np.cos(turn + k * 2 * np.pi / 3)
        out += signal.oaconvolve(x * share, tail / np.linalg.norm(tail))[:N]
    return out


def scene():
    """Mixes the direct sounds with kitchen echoes; thumps, shaking and room tone get no echo."""
    rustle = rub() + squeaks()
    low_shake, room_tone = shake(), hush()
    far = clatter() + hollow_notes() + metal_ring()
    near = smacks() + pips()
    wet = kitchen(gain_of(-8) * near + gain_of(-10.5) * far + gain_of(-9.5) * rustle)
    return (thumps() + near + far + wet + rustle + low_shake + room_tone)[None]


def record(dry):
    """Takes away the treble above 16000 Hz with a steep low-pass filter."""
    low_pass = signal.firwin(511, 16000, window=("kaiser", 9), fs=SR)
    return signal.oaconvolve(dry, low_pass[None], "same")


dry = scene()
out = record(dry)
to_wav(out)
```